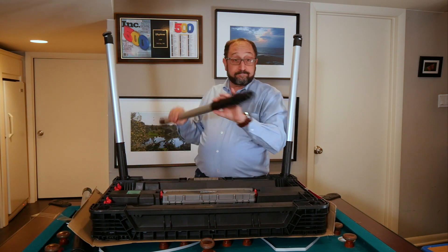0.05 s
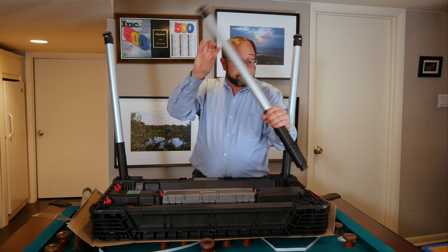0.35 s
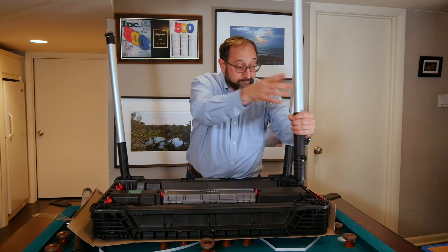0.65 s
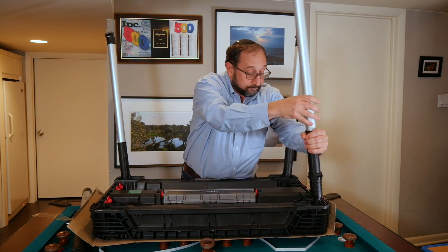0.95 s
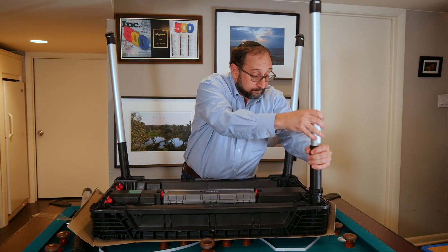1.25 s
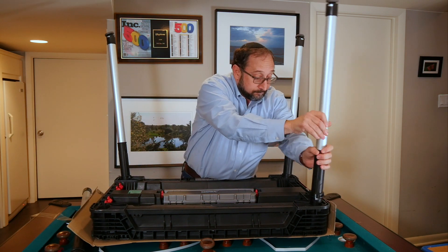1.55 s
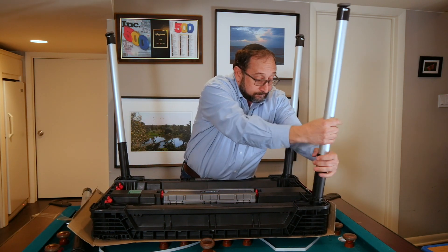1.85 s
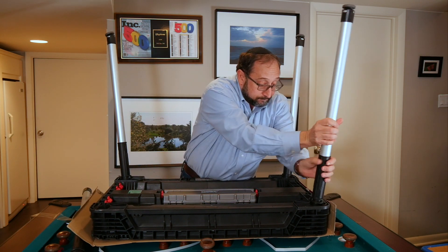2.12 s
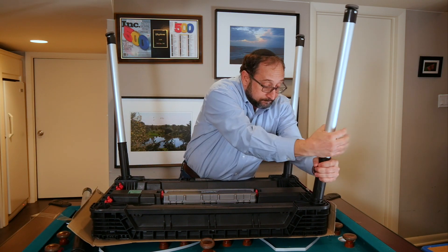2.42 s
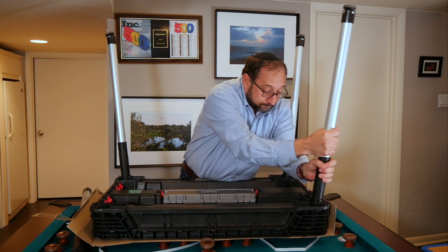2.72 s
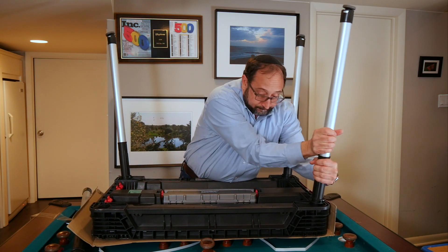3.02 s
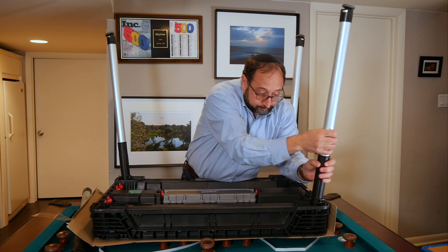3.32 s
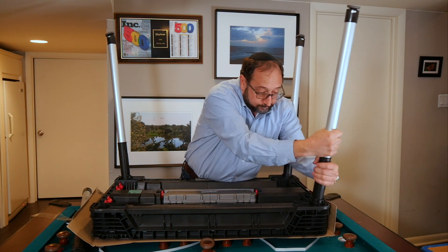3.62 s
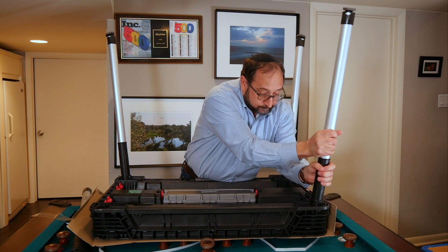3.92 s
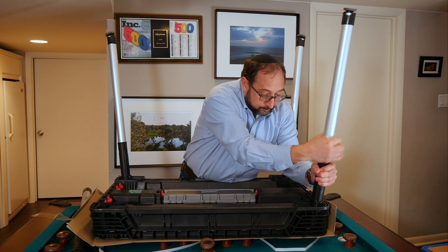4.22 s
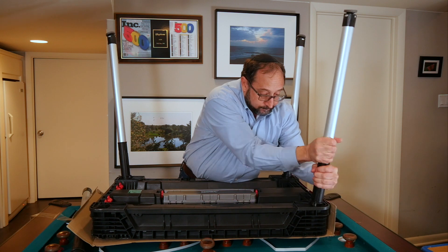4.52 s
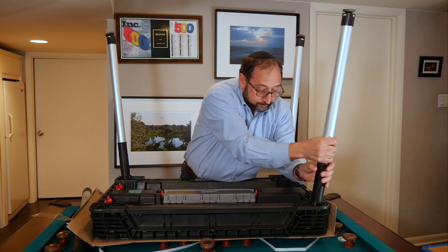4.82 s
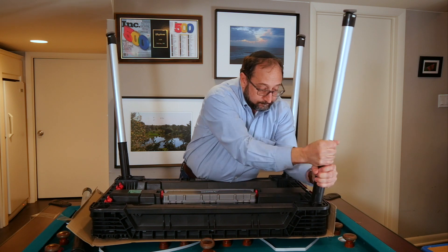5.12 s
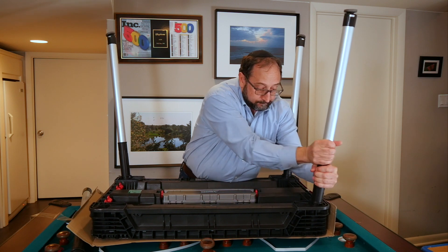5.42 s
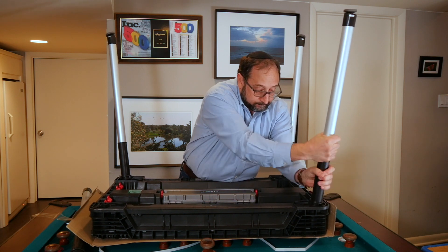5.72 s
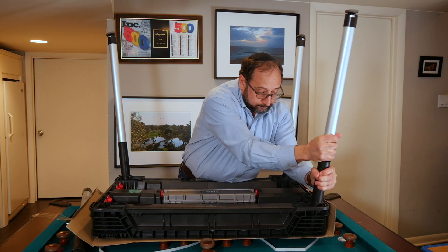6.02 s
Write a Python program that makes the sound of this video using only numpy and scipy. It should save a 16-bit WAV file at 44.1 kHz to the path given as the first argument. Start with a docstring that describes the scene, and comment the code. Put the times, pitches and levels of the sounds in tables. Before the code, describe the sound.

Hollow plastic knocks and a metal clink, then uneven rasping, groaning and small squeaks as a leg is screwed into its socket.

```python
"""Screwing a leg into a workbench.

A small, quiet room, one microphone close by. Sleeves brush and a palm skids as an aluminium leg is set
into the socket of a hollow plastic bench. The leg knocks about and rings; turn after turn its thread
sticks and slips, shaking the shell, rasping and now and then squeaking."""
import sys
import numpy as np
from scipy import signal
from scipy.fft import rfft, irfft
from scipy.io import wavfile
from scipy.ndimage import uniform_filter1d, map_coordinates

SR = 44100
rng = np.random.default_rng(int(sys.argv[2]) if len(sys.argv) > 2 else 0)


def inscribe(sig):
    """Save sig as 16-bit PCM at rate SR to the path in sys.argv[1].

    A 1-D sig is mono; a 2-D sig holds one channel per row.
    Samples are clipped to [-1, 1] before scaling.
    """
    pcm = np.round(np.clip(np.atleast_2d(sig).T, -1, 1) * 32767)
    wavfile.write(sys.argv[1], SR, pcm.astype(np.int16))


N = 275830
TIME = np.arange(N) / SR
RING_TIME = TIME[:16384]

# Arm movements. Each row: loudest moment in seconds, half length in seconds, level in dB.
SLEEVE_BRUSHES = [(0.262, 0.15, -52.5), (0.714, 0.26, -57.5), (2.66, 0.11, -57), (3.35, 0.32, -55.5),
                  (4.312, 0.13, -53), (4.867, 0.19, -53.5), (5.657, 0.086, -53)]
# Dry ticks of fingers and thread. Each row: start in seconds, level in dB.
LIGHT_TICKS = [(0.29, -40.5), (0.546, -36.5), (0.816, -42.5), (1.3988, -33), (2.72, -30.5), (2.755, -20.5),
               (2.7896, -21), (2.996, -30), (3.305, -43), (3.936, -22.5), (4.016, -18.5), (4.265, -42.5),
               (4.4995, -22.5), (4.731, -32.5), (4.749, -34), (5.281, -43), (5.42, -20), (5.965, -24.5)]
# The palm on the tube. Each row: loudest moment in seconds, rise in seconds, level in dB.
PALM_SKIDS = [(0.552, 0.028, -53), (0.627, 0.049, -33.5)]
# The leg hits the socket. Each row: start in seconds, level in dB, wall note in Hz, crack in relative dB.
SOCKET_KNOCKS = [(1.128, -18, 390, -41), (1.14, -9, 392, -38), (1.172, -27, 422, -36),
                 (1.194, -25, 412, -40), (1.28, -24.5, 406, -22), (1.319, -20.5, 398, -32),
                 (1.338, -13.5, 560, -21.5), (1.347, -10, 458, -19.5), (1.418, -5, 557, -7),
                 (1.58, -23.5, 450, -13), (1.687, -23.5, 624.4, -26.5), (1.76, -12, 553, -12),
                 (2.024, -15.5, 282, -33.5), (2.033, -15, 571.7, -21), (2.087, -14, 470, -21.5),
                 (2.15, -16, 398, -23.5), (2.18, -9, 598, -22), (2.212, -11.5, 642.3, -10),
                 (2.285, -15.5, 519.8, -22), (3.011, -28, 565, -20), (3.555, -15.5, 588, -15.5),
                 (3.587, -19, 262.8, -39), (3.622, -22, 506, -12), (3.656, -25, 549, -18),
                 (3.703, -20, 298, -22), (3.811, -15, 528.8, -30), (3.93, -19, 160, -48),
                 (4.539, -11, 538, -4), (4.758, -26, 409, -28), (5.201, -20.5, 398, -15.5),
                 (5.422, -27.5, 390, -1), (5.812, -34, 410.7, -42), (5.848, -29, 448, -30),
                 (5.999, -5.5, 475.6, -10), (6.031, -17, 471, -28)]
# Twists of the leg. Each row: moment of full force, rise and length in seconds, level in dB,
# rasp and grit in relative dB.
LEG_TWISTS = [(1.151, 0.019, 0.043, -21, -3.5, -69), (1.34, 0.01, 0.082, -24, 0.5, -35),
              (1.432, 0.025, 0.058, -21, -2, -37), (1.568, 0.059, 0.17, -45, 9.5, -10.5),
              (1.74, 0.079, 0.021, -43, 12.5, -10), (1.798, 0.041, 0.043, -22, 0, -66),
              (1.879, 0.014, 0.037, -36, -6, -44), (2.03, 0.014, .13, -33, -15.5, -28),
              (2.225, 0.051, 0.1, -19.5, 1.5, -33), (2.382, 0.056, 0.034, -35, 10, -61),
              (2.689, 0.17, 0.056, -47, -1, -6), (2.767, 0.07, 0.075, -27, 3, -6.5),
              (3.027, 0.041, 0.043, -36.5, -16, -25), (3.52, 0.03, 0.034, -38, 7, -38),
              (3.557, 0.034, 0.17, -35.5, -9, -40), (3.766, 0.031, 0.059, -24, 5, -19.5),
              (3.846, 0.061, 0.092, -24.5, 4, -37), (3.928, 0.069, 0.027, -26, -4, -9.5),
              (4.014, 0.014, 0.028, -25.5, -5, -11), (4.424, 0.17, 0.03, -43, -5, -31),
              (4.452, 0.041, 0.052, -27, 0, -24), (4.535, 0.037, .032, -17.5, 4, -14.5),
              (4.583, .04, 0.054, -24.5, 4, -20), (4.743, 0.035, 0.019, -29.5, -5.5, -14),
              (5.198, 0.027, 0.026, -32, 3.5, -21.5), (5.284, 0.021, 0.026, -31, -0.5, -22),
              (5.418, 0.015, 0.019, -25.5, -15, -13), (5.621, 0.082, 0.013, -40.5, -2.5, -6),
              (5.863, 0.02, 0.018, -32.5, -9, -12), (5.896, 0.074, 0.1, -26.5, 4, -32),
              (6.002, 0.018, 0.14, -25, -0.5, -18.5), (6.187, 0.09, 0.047, -26, -0.5, -9.5)]
# The tube squeaks. Each row: loudest moment and half length in seconds, pitch in Hz, level in dB.
TUBE_SQUEAKS = [(1.18, .03, 4830, -60), (1.245, .035, 2570, -48), (2.05, .028, 2600, -51),
                (2.305, .018, 2800, -33), (2.315, .045, 4730, -44), (2.305, .025, 6450, -52),
                (4.47, .03, 985, -34), (4.454, .015, 1866, -42), (4.49, .022, 9120, -52),
                (5.21, .02, 1860, -41), (5.639, .024, 930, -37), (5.92, .03, 9097, -53)]
# Strikes on the tube. Each row: start in seconds, level in dB.
TUBE_STRIKES = [(1.399, -54), (1.466, -27.5)]
# The tube's modes. Each row: frequency in Hz, level in dB, time to fall 60 dB in seconds.
TUBE_MODES = [(2130, -13, .35), (2412, -14, .26), (2620, -9, .44), (2858, -4, .85), (2904, -13, .55),
              (3381, -13, .28), (3486, -6, .45), (3513, -1, .75), (3588, -2, .42), (4490, -9, .43),
              (4570, -13, .35), (5280, -16, .3), (6126, -8, .37), (6217, -8, .32), (6944, -16, .25),
              (8516, -14.5, .26), (8635, -16, .24), (8769, -18, .24), (9232, -22, .2), (11430, -32, .16)]
# The leg is leant on. Each row: loudest moment in seconds, half length in seconds, level in dB.
BENCH_BOOMS = [(2.24, 0.018, -20.5), (3.84, 0.073, -28.5), (3.95, 0.02, -32)]

# The tone colour of each sound as heard. Each row: frequency in Hz, relative level in dB.
AIR_SPECTRUM = [(29, -51.5), (60, -19), (255, -7.5), (667, -7.5), (912, -7.5), (1390, -19.5), (1780, -18),
                (7280, -32), (10400, -39), (13500, -46), (22000, -120)]
CLOTH_SPECTRUM = [(100, -10), (400, 16.5), (1200, -1.5), (2700, 3.5), (7500, -14), (10000, -25.5),
                  (14000, -33)]
TICK_SPECTRUM = [(300, -5), (1500, 1), (3200, 7.5), (4300, -5), (6500, -7), (9500, -15), (11500, -39),
                 (14000, -62)]
SKIN_SPECTRUM = [(300, -19), (1550, 15.5), (2600, 1), (3550, 3), (4400, -12), (5800, 1), (9000, -10),
                 (13000, -39)]
SHELL_SPECTRUM = [(30, -52.5), (60, -34), (105, -20), (150, 0), (300, -4), (450, 0), (680, -2),
                  (1000, -14.5), (1300, -20), (2500, -36), (8000, -94)]
CRACK_SPECTRUM = [(300, -18.5), (1000, 24.5), (1600, 5.5), (3200, 2), (4200, -8.5), (6500, -9), (9500, -41),
                  (13000, -50)]
RASP_SPECTRUM = [(300, -43), (900, 9.5), (1300, 4), (1800, 1), (2300, -14), (3200, -38), (4200, -43.5),
                 (14000, -84)]
EDGE_SPECTRUM = [(1200, -2.5), (2300, 2.5), (3000, 5.5), (4000, -4.5), (5000, -8.5), (6500, -16),
                 (11000, -56), (14000, -75.5)]
GRIT_SPECTRUM = [(1500, -19), (3500, 0.5), (5600, 8.5), (6800, 5.5), (8000, -1), (9600, -4.5),
                 (10700, -17.5), (12000, -30), (13500, -55.5)]
CLASH_SPECTRUM = [(300, -2), (1500, 10), (3200, -14), (4100, -12), (6500, -7), (9300, -29), (10500, -44)]
BENCH_SPECTRUM = [(70, -33.5), (150, 0.5), (210, 7.5), (2600, -115)]
# Resonances of the plastic shell and the thread. Each row: centre in Hz, width in Hz, lift in dB.
SHELL_RESONANCES = [(173, 24, 1.5), (264, 20.4, 8.5), (339.6, 57, 4.5), (424, 140, 5), (535, 7.5, 2),
                    (668, 92, 4), (920, 40, 10), (1021, 80, 8.5)]
THREAD_RESONANCES = [(1318, 45, 4.8), (1970, 130, 4.2), (2620, 130, 7.5), (2850, 130, 1.2),
                     (3430, 260, 4.1), (4776, 100, 10.2), (9030, 220, 9.6)]


def undb(db):
    """Decibels to gain."""
    return 10 ** (np.asarray(db) / 20)


def unit(x):
    """Scale to unit energy."""
    return x / np.sqrt(np.sum(x ** 2))


def peak_at(db, x):
    """Scale to a peak level."""
    return undb(db) * x / np.abs(x).max()


def add(out, s, sound):
    """Mix a sound in at s seconds."""
    start = int(s * SR)
    out[start:start + len(sound)] += sound[:N - start]


def through(x, impulse):
    """Pass a signal through an impulse response."""
    return signal.fftconvolve(x, impulse)[:len(x)]


def body(spectrum, resonances=()):
    """Causal impulse response of a thing with this spectrum and these resonances."""
    size = len(RING_TIME)
    f = np.maximum(np.fft.rfftfreq(size, 1 / SR), 1)
    hz, db = np.transpose(spectrum)
    db = np.interp(np.log(f), np.log(hz), db)
    for centre, width, lift in resonances:
        db = db + lift / (1 + (2 * (f - centre) / width) ** 2)
    # minimum phase: the energy comes as early as it can
    cepstrum = irfft(np.log(undb(db)))
    cepstrum[1:size // 2] *= 2
    cepstrum[size // 2 + 1:] = 0
    return unit(irfft(np.exp(rfft(cepstrum))))


def fade(t60):
    """Decay by 60 dB in t60 seconds."""
    return np.exp(-np.log(1000) * RING_TIME / t60)


def scatter(t60):
    """A dying burst of dense random contacts that takes a moment to build."""
    return unit(rng.standard_normal(len(RING_TIME)) * (fade(t60) - fade(t60 / 10)))


def blow(chatter_db):
    """One clean push followed by chatter."""
    return (RING_TIME == 0) + undb(chatter_db) * scatter(t60=.076)


def hump(s, half_length):
    """Gain of a smooth swell around time s."""
    return np.exp(-np.minimum(((TIME - s) / half_length) ** 2, 20))


def stroke(s, rise, length, sag_db_per_s, release_db_per_s):
    """Gain of one push of the hand: it builds 30 dB over the rise to time s, sags, then lets go."""
    age = TIME - s
    build = 30 * np.minimum(age, 0) / rise
    sag = sag_db_per_s * np.clip(age, 0, length)
    release = release_db_per_s * np.maximum(age - length, 0)
    return undb(np.maximum(build - sag - release, -160))


def wander(hold_s, size):
    """A smooth random curve that takes a new value every hold_s."""
    place = np.arange(size) / SR / hold_s
    return map_coordinates(rng.standard_normal(int(place[-1]) + 2), [place], order=3, mode="mirror")


def even(x, span_s=.025):
    """The wrist's torque is steady, so the power over a short span stays near one."""
    return x / np.sqrt(np.abs(uniform_filter1d(x ** 2, int(span_s * SR))) + 1e-12)


def slips(rate_hz, jitter, spread_db):
    """Stick-slip pulses of uneven spacing and size, with unit power."""
    rate_hz = np.broadcast_to(rate_hz, N)
    phase = np.cumsum(rate_hz) / SR
    gap, size = rng.standard_normal((N // 4, 2)).T
    at = np.searchsorted(phase, np.cumsum(np.exp(jitter * gap)))
    at = at[at < N]
    pulses = np.zeros(N)
    pulses[at] = undb(spread_db * np.minimum(size[:len(at)], 2)) / np.sqrt(rate_hz[at])
    return unit(pulses) * np.sqrt(N)


def crumble(pulses, t60, steady):
    """Each slip tears over tiny bumps: a burst of noise after every pulse, over a steady hiss."""
    power = np.abs(through(pulses ** 2, unit(fade(t60)) ** 2))
    return rng.standard_normal(N) * np.sqrt((power + steady) / (1 + steady))


def shifting(x, step_hz, patchy_db=6, hold_s=.035):
    """The contact travels round the socket, so neighbouring resonances swell and fade on their own."""
    padded = np.pad(x, (0, 2048), "reflect", reflect_type="odd")
    f, _, frames = signal.stft(padded, SR, nperseg=1024)
    place = np.meshgrid(f / step_hz, np.linspace(0, N / SR / hold_s, frames.shape[1]), indexing="ij")
    chance = rng.standard_normal([int(axis.max()) + 2 for axis in place])
    gain = undb(patchy_db * np.tanh(map_coordinates(chance, place, order=1)))
    return signal.istft(frames * gain / np.sqrt(np.mean(gain ** 2)), SR)[1][:N]


def drifting(x, drift_s=.0004):
    """Load and grip change, and the resonances slide a little with them."""
    warped_time = TIME + drift_s * wander(hold_s=.06, size=N)
    return map_coordinates(x, [warped_time * SR], order=3, mode="mirror")


def room_tone():
    """The faint, steady air of the room."""
    return undb(-56) * through(rng.standard_normal(N), body(AIR_SPECTRUM))


def sleeves():
    """Shirt cloth catches and slips as the arms move."""
    rustle = crumble(slips(rate_hz=200, jitter=.8, spread_db=1), t60=.012, steady=.72)
    arms = sum(undb(db) * hump(s, half_length) for s, half_length, db in SLEEVE_BRUSHES)
    return through(rustle * arms, body(CLOTH_SPECTRUM, resonances=[(9300, 110, 20)]))


def ticks():
    """Small bright contacts that hardly move the shell."""
    out, colour = np.zeros(N), body(TICK_SPECTRUM, THREAD_RESONANCES)
    for s, db in LIGHT_TICKS:
        add(out, s, peak_at(db + .9, through(scatter(t60=.07), colour)))
    return out


def palm():
    """Skin sticks and skids along the tube."""
    skid = crumble(slips(rate_hz=420, jitter=.63, spread_db=1.5), t60=.018, steady=.26)
    grip = sum(undb(db) * stroke(s, rise, length=.012, sag_db_per_s=80, release_db_per_s=480)
               for s, rise, db in PALM_SKIDS)
    colour = body(SKIN_SPECTRUM, resonances=[(1540, 100, 3.3), (3530, 300, 20.6), (3950, 110, 11)])
    return through(skid * grip, colour)


def knocks():
    """Each knock thuds through the hollow shell and wakes one wall's own note; hard ones also crack."""
    out = np.zeros(N)
    shell, crack = body(SHELL_SPECTRUM, SHELL_RESONANCES), body(CRACK_SPECTRUM, THREAD_RESONANCES)
    soft_crack_db, soft_swell_s, soft_note_gain = -36.5, .0043, 2.8
    for s, db, hz, crack_db in SOCKET_KNOCKS:
        # the softer the push, the slower the note swells and the more it stands out
        softness = np.clip(crack_db / soft_crack_db, .2, 1.3)
        age = RING_TIME / (soft_swell_s * softness)
        wall = age ** 2 * np.exp(-age) * np.sin(2 * np.pi * hz * RING_TIME)
        note = through(blow(chatter_db=-3), wall)
        thud = through(blow(chatter_db=2.5), shell)
        snap = through(scatter(t60=.021), crack)
        hollow = unit(unit(thud) + soft_note_gain * softness ** 2 * unit(note))
        add(out, s, peak_at(db + 2, hollow + undb(crack_db) * snap))
    return out


def effort():
    """How hard the twists drive the shell, the rasp and the grit."""
    force = rasp = grit = 0
    for s, rise, length, db, rasp_db, grit_db in LEG_TWISTS:
        push = stroke(s, rise, length, sag_db_per_s=50, release_db_per_s=340)
        grit_push = stroke(s, rise, length, sag_db_per_s=40, release_db_per_s=400.5)
        force = np.maximum(force, undb(db) * push)
        rasp = np.maximum(rasp, undb(db + rasp_db) * push)
        grit = np.maximum(grit, undb(db + grit_db) * grit_push)
    return force, rasp, grit


def grinding(pulses, rasp, grit):
    """Each slip rasps and sheds fine clicks; where the metal bites hard, the rasp gains a bright edge."""
    scrape = through(crumble(pulses, t60=.016, steady=.15), body(RASP_SPECTRUM, THREAD_RESONANCES))
    edge = through(crumble(pulses, t60=.011, steady=.15), body(EDGE_SPECTRUM, THREAD_RESONANCES))
    fizz = through(crumble(pulses, t60=.034, steady=.29) * grit, body(GRIT_SPECTRUM, THREAD_RESONANCES))
    bite = rasp * (grit / (rasp + 1e-9)) ** .3
    grind = undb(-1) * rasp * even(scrape) + undb(1.5) * bite * even(edge) + undb(-1) * fizz
    return shifting(drifting(grind), step_hz=300)


def thread():
    """The thread sticks and slips, thumping the shell; the whole bench drums when the leg is leant on."""
    force, rasp, grit = effort()
    # the harder the twist, the faster the slips
    slip_hz, reference_db, db_per_octave = 215.45, -24, 24
    octaves = np.clip((20 * np.log10(force) - reference_db) / db_per_octave, -1, 1)
    pulses = slips(slip_hz * 2 ** octaves, jitter=.36, spread_db=2.7)
    # the plastic shudders on between slips
    push = .7 * pulses + .7 * crumble(pulses, t60=.025, steady=.2)
    shell = through(push, body(SHELL_SPECTRUM, SHELL_RESONANCES))
    groan = force * even(shifting(shell, step_hz=130))
    lean = sum(undb(db) * hump(s, half_length) for s, half_length, db in BENCH_BOOMS)
    boom = lean * even(through(push, body(BENCH_SPECTRUM)))
    return undb(1.5) * groan + boom + undb(-6) * grinding(pulses, rasp, grit)


def squeaks():
    """For a moment the friction of tube on plastic locks onto one resonance."""
    out = np.zeros(N)
    for s, half_length, hz, db in TUBE_SQUEAKS:
        band = signal.butter(2, [hz - 70, hz + 70], "band", fs=SR, output="sos")
        tone = even(signal.sosfilt(band, rng.standard_normal(N)))
        out += undb(db) * tone * hump(s, half_length)
    return out


def tube_ring():
    """After a short clash the tube rings, every mode fluttering as it rattles against the socket."""
    out, ring = np.zeros(N), 0
    rattle_db, rattle_rad, attack_s = 2.5, .7, .001
    for hz, db, t60 in TUBE_MODES:
        flutter_db = rattle_db * wander(hold_s=.01, size=len(RING_TIME))
        flutter_rad = rattle_rad * wander(hold_s=.01, size=len(RING_TIME))
        phase = 2 * np.pi * (hz * RING_TIME + rng.random()) + flutter_rad
        ring = ring + undb(db + flutter_db) * fade(t60) * np.sin(phase)
    metal = body(CLASH_SPECTRUM, resonances=[(hz, 160, 9) for hz, _, _ in TUBE_MODES])
    clash = through(scatter(t60=.24), metal)
    clink = ring * np.minimum(RING_TIME / attack_s, 1) + peak_at(5, clash)
    for s, db in TUBE_STRIKES:
        add(out, s, undb(db) * clink)
    return out


def room(x):
    """Near walls answer within milliseconds, favouring no note; the treble dies first."""
    split_hz, first_echo_s, tail_db = 1800, .004, -2.5
    noise = rng.standard_normal(len(RING_TIME))
    low = signal.sosfilt(signal.butter(2, split_hz, fs=SR, output="sos"), noise)
    high = signal.sosfilt(signal.butter(2, split_hz, "high", fs=SR, output="sos"), noise)
    tail = unit((low * fade(t60=.17) - high * fade(t60=.14)) * (RING_TIME > first_echo_s))
    echoes = (RING_TIME == 0) + undb(tail_db) * tail
    hz = np.fft.rfftfreq(len(RING_TIME), 1 / SR)
    colour_db = 10 * np.log10(uniform_filter1d(np.abs(rfft(echoes)) ** 2, size=13))
    flatten = body(np.column_stack([hz, -colour_db])[1:])
    return through(x, unit(through(echoes, flatten)))


def scene():
    """At the microphone, in mono: the bench work with its echoes, the tube's dry ring, room tone."""
    air = room_tone()
    work = thread() + knocks() + ticks() + squeaks() + palm() + sleeves()
    return (room(work) + tube_ring() + air)[None]


def record(dry):
    """The deepest bass is removed and the recorder cuts the top."""
    bass_hz, top_hz = 60, 15700
    thin = signal.sosfilt(signal.butter(2, bass_hz, "high", fs=SR, output="sos"), dry)
    return signal.sosfilt(signal.ellip(8, .2, 70, top_hz, fs=SR, output="sos"), thin)


dry = scene()
out = record(dry)
inscribe(out)
```